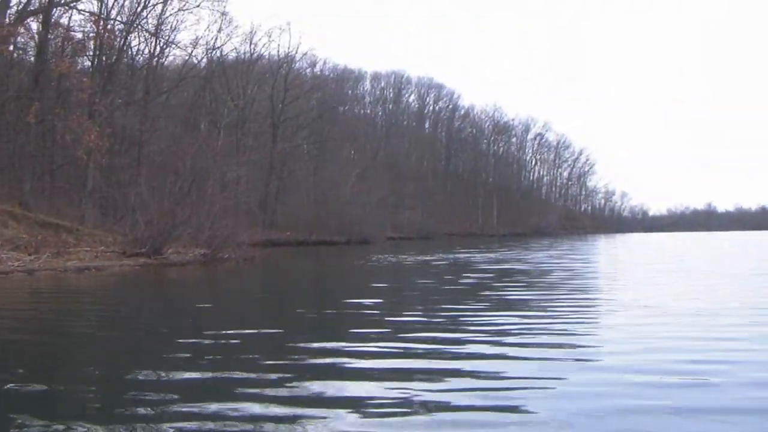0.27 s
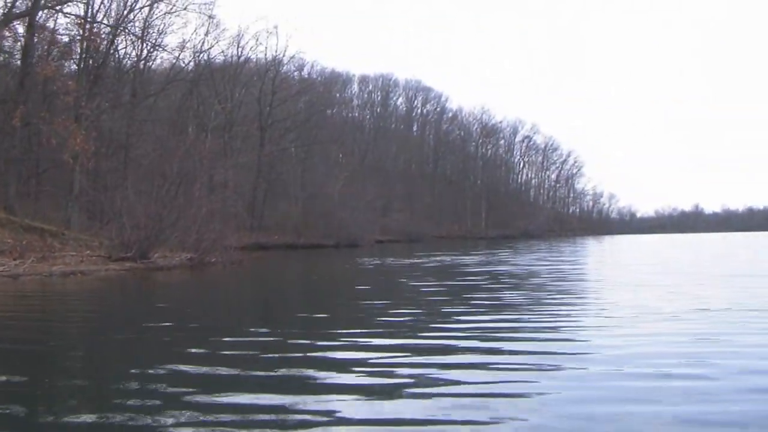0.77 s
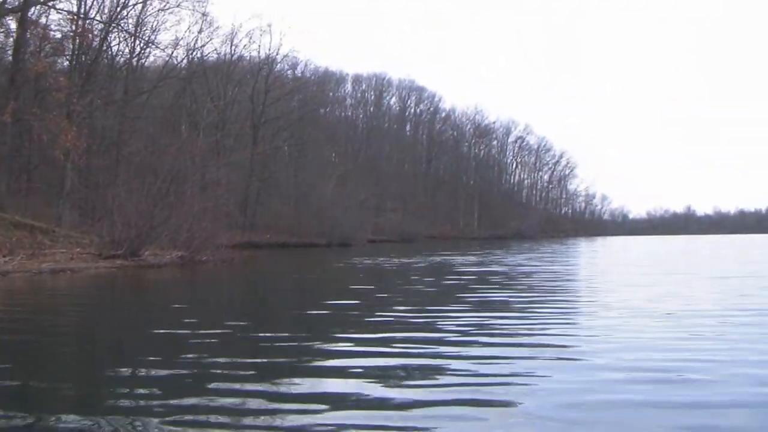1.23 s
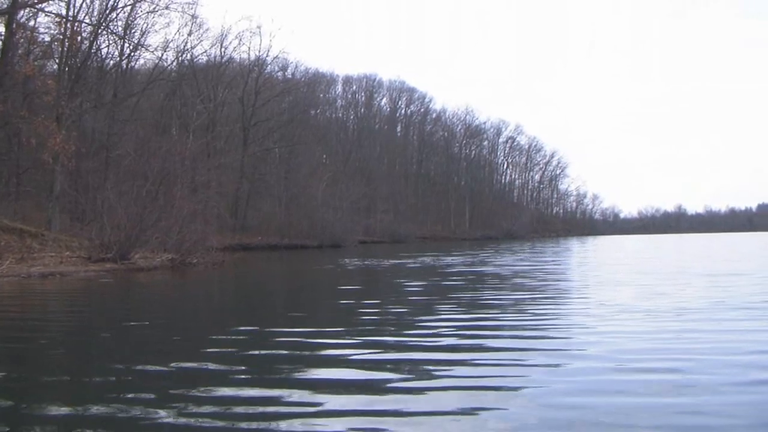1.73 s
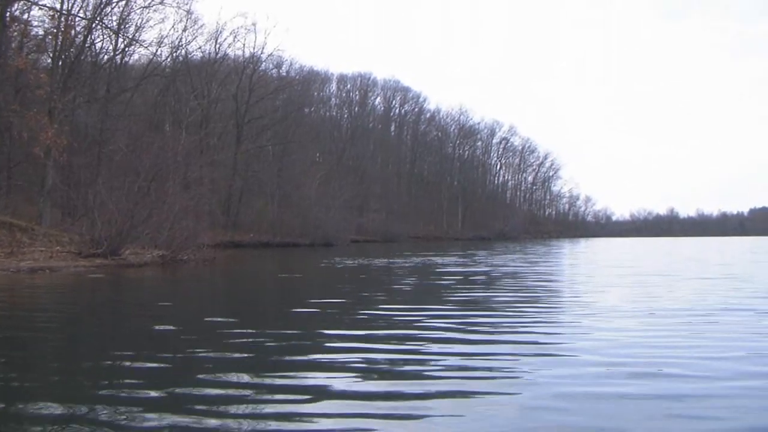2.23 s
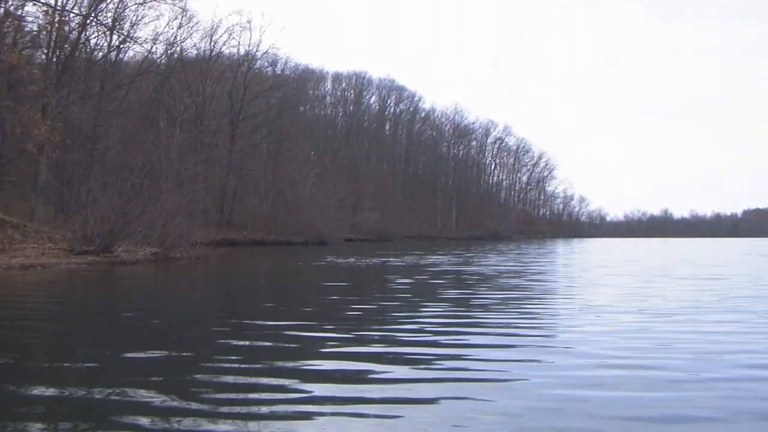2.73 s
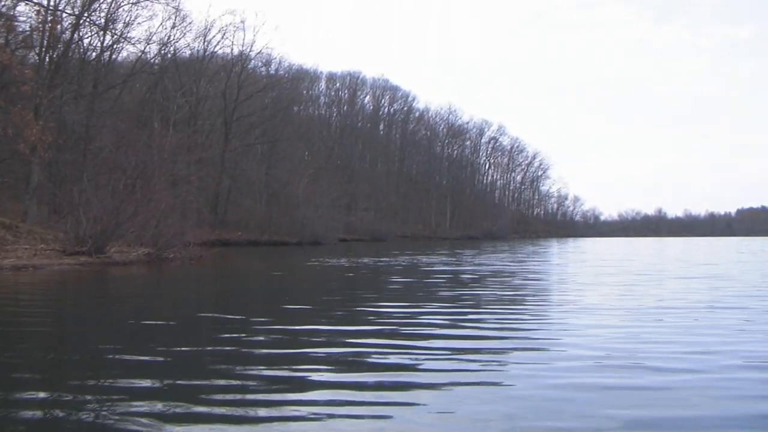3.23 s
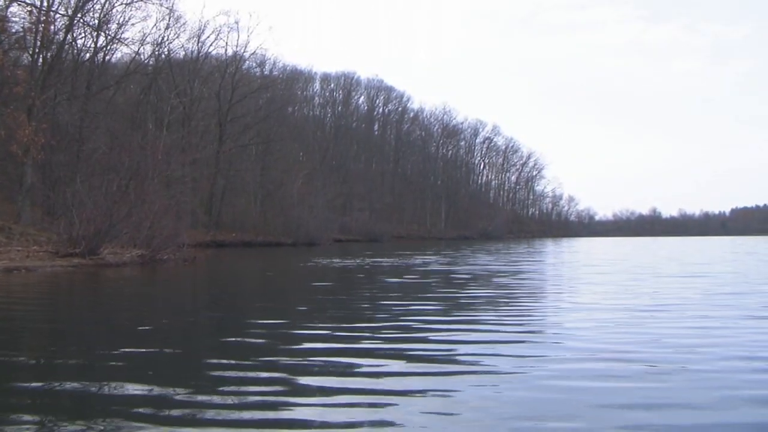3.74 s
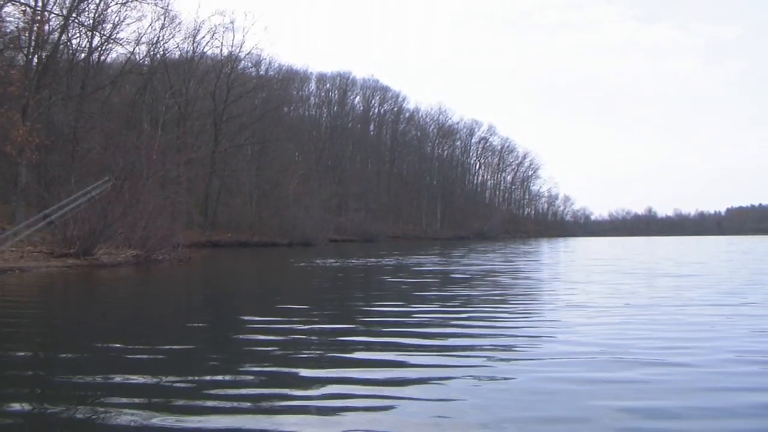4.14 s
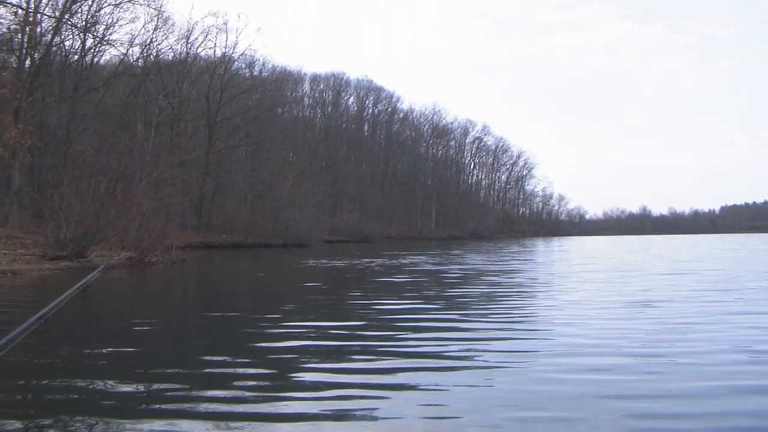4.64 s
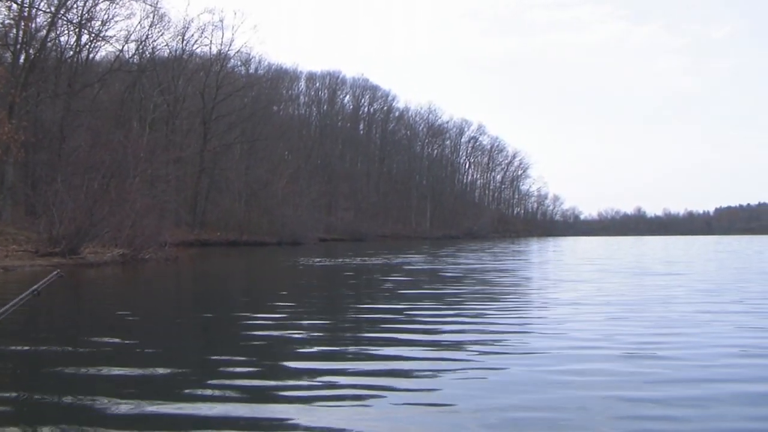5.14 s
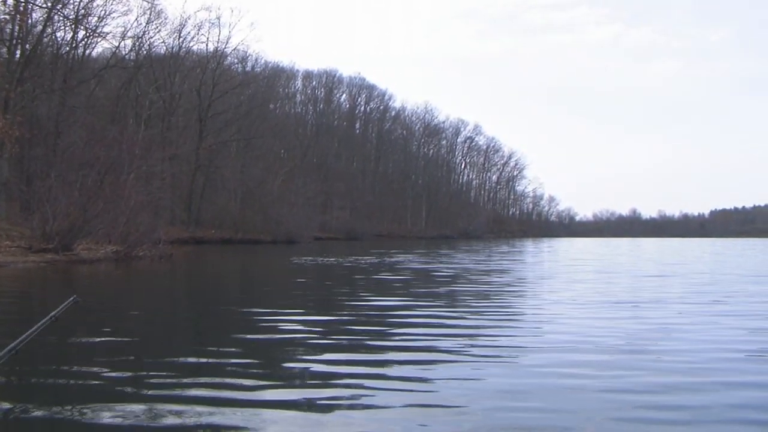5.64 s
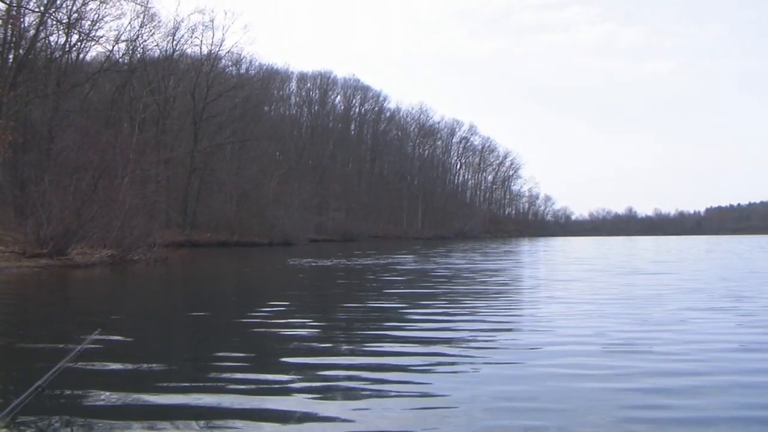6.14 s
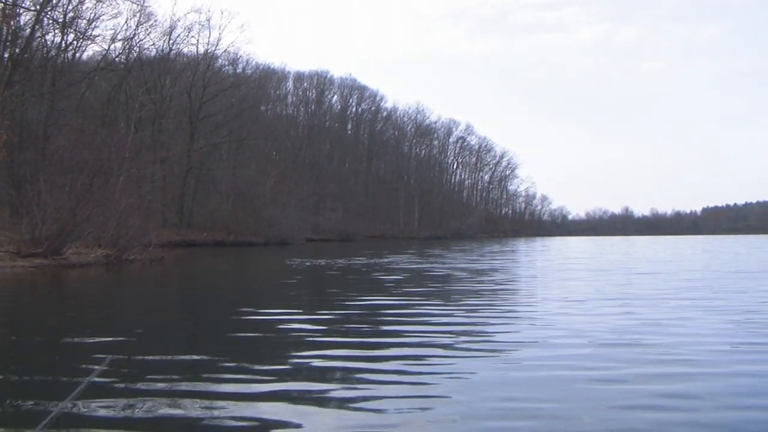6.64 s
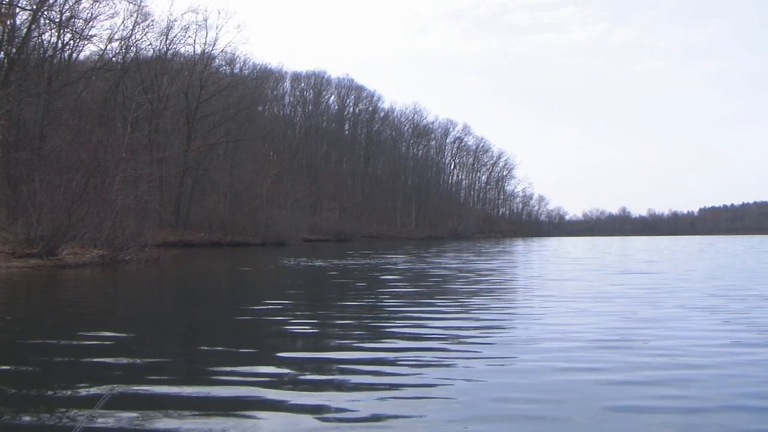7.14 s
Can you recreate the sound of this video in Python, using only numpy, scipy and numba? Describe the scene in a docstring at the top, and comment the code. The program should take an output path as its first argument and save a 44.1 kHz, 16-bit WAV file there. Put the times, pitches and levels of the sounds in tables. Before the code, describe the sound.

A close fishing cast begins with a brief gritty rod swish already dying away. Thin line hisses outward, brushing and ticking against the guides, until a sharp metallic bail snap at about 1.4 seconds. Small handling knocks follow while woodland birds whistle, churr and chip. Four faint taps come late, then distant tyre noise swells. Quiet outdoor lake, stereo microphone near the angler on the left, with soft tree echoes and light hiss.

```python
"""A fishing rod swishes in a cast from a small boat on a wooded lake: a burst of gritty noise that dies away.
Line whistles out as a moving noise band, brushes the guides and ticks against them.
The bail snaps shut and the reel settles: short blows ring many small modes, which the ticks share.
Birds sing sliding near-sine notes from the trees, and four faint taps ring there too.
Far road noise and low hum lie underneath; a car's tyre roar swells at the end."""
import sys
import numpy as np
from scipy import signal
from scipy.fft import rfft, irfft, next_fast_len
from scipy.io import wavfile
from scipy.ndimage import uniform_filter1d
from numba import njit

SR = 44100
rng = np.random.default_rng(int(sys.argv[2]) if len(sys.argv) > 2 else 0)


def master(y):
    """Save y as 16-bit WAV."""
    cut = np.clip(np.atleast_2d(y).T, -1, 1)
    pcm = np.round(cut * 32767)  # scale
    wavfile.write(sys.argv[1], SR, pcm.astype(np.int16))


def voltage_ratio(decibels):
    """Convert decibels (scalar or array-like) to amplitude ratios, 20 dB per decade."""
    exponent = np.asarray(decibels, float) / 20
    return 10 ** exponent


N = 326163  # samples, about 7.4 s
T = np.arange(N) / SR
TOP_HZ = 15800  # upper edge of the noises and of the finished sound


def curve(table, column=1):
    """One column of a table, read over time."""
    rows = np.array(table)
    return np.interp(T, rows[:, 0], rows[:, column])


def over_hz(table, hz):
    """A table over pitch, read on a log-frequency axis."""
    rows = np.array(table)
    return np.interp(np.log(hz), np.log(rows[:, 0]), rows[:, 1])


def unit(x):
    """Scales to rms 1."""
    return x / np.sqrt(np.mean(x ** 2))


def coloured(colour, alike):
    """Spectrum of stereo noise with a given colour, and its Hz axis; alike: likeness of both ears, -1 to 1."""
    hz = np.maximum(np.fft.rfftfreq(N, 1 / SR), 1)
    mid, side = rfft(rng.standard_normal((2, N)))
    like = np.clip(alike(hz), -1, 1)
    ears = np.sqrt(1 + like) * mid + np.sqrt(1 - like) * side * np.array([[1], [-1]])
    return voltage_ratio(over_hz(colour, hz)) * (hz < TOP_HZ) * ears, hz


def walk(rate):
    """Random levels held 1 / rate s and smoothed twice; scaled to rms 1."""
    k = int(SR / rate)
    held = np.repeat(rng.standard_normal(N // k + 1), k)
    return unit(uniform_filter1d(uniform_filter1d(held, k), k)[:N])


def place(x, pan_db, turn):
    """Sets a sound between left and right by a level step [dB] and a phase turn [rad]."""
    z = signal.hilbert(x, next_fast_len(N))[:N]
    right = np.real(z * np.exp(-1j * turn))
    return np.array([voltage_ratio(pan_db / 2) * x, voltage_ratio(-pan_db / 2) * right])


def echo(x, t60, wet_db, from_s):
    """Scattered returns as a dying noise tail, different at each ear."""
    t = np.arange(int(t60 * SR)) / SR
    tail = rng.standard_normal((2, len(t))) * np.exp(-np.log(1000) * t / t60) * (t > from_s)
    tail = tail / np.sqrt((tail ** 2).sum(axis=1, keepdims=True))
    return voltage_ratio(wet_db) * signal.fftconvolve(x[None], tail, axes=1)[:, :N]


def ring(modes, chance):
    """Dying sines, one per mode; chance shifts each one's strength and, slightly, its pitch."""
    t = np.arange(int(.08 * SR)) / SR
    hz, db, t60 = np.transpose(modes)[:, :, None]
    strength = voltage_ratio(db + 2.5 * chance[0])
    decay = np.exp(-np.log(1000) * t / t60)
    return strength * decay * np.sin(2 * np.pi * hz * (1 + .012 * chance[1]) * t)


@njit
def svf(x, hz, widths):
    """State-variable band-pass whose centre and width can move; width is a share of the centre."""
    y, b, l = np.empty(len(x)), 0., 0.
    for i in range(len(x)):
        g, width = np.tan(np.pi * hz[i] / SR), widths[i]
        v = (b + g * (x[i] - l)) / (1 + g * (g + width))
        b, l, y[i] = 2 * v - b, l + 2 * g * v, width * v
    return y


# rod through the air: (time [s], level [dB], left minus right [dB])
ROD_SWISH = [(0.0, -30.5, 10), (0.006, -30, 6.5), (0.092, -48, 7.5), (0.2, -57.5, 10)]
# colour of that air noise: (pitch [Hz], relative level [dB per Hz])
ROD_COLOUR = [(90, -53), (200, -22.5), (750, -3.5), (1500, -2.5), (3000, -2.5), (5100, -4), (8000, -9),
              (15500, -18)]


def swish():
    """Eddies shed by the rod tip: gritty broad noise that dies as the rod stops."""
    smooth = unit(irfft(coloured(ROD_COLOUR, lambda hz: .05 + 0 * hz)[0], N))
    air = smooth * voltage_ratio(2.6 * walk(2500))  # fast random level changes make the grit
    pan_db = curve(ROD_SWISH, 2) * np.array([[.5], [-.5]])
    fade = np.clip((ROD_SWISH[-1][0] + 0.054 - T) / 0.07, 0, 1)
    return air * voltage_ratio(curve(ROD_SWISH) + pan_db) * fade


# line flying out, before the tugs: (time [s], level [dB], centre [Hz], width [share of centre])
LINE_WHISTLE = [(0, -53, 10000, 1.4), (.05, -46.5, 11800, 1.3), (.2, -49, 12300, 1.8),
                (.35, -48.5, 13200, 0.84), (.5, -51.5, 9400, 0.78), (.74, -59, 8200, 0.9),
                (.84, -65, 7500, 0.73), (.92, -71, 7000, .4)]
# jerks that speed the line up for a moment: (time [s], gain [dB])
LINE_TUGS = [(.42, 1.5), (.565, 4), (.67, 5.5)]
TUG_S, TUG_HZ_PER_DB, TUG_WIDTH_PER_DB = 0.027, 420, .06


def line():
    """Thin line whistles as a noise band whose centre follows its speed, with a random flutter in level."""
    tug_db = sum(db * np.exp(-((T - s) / TUG_S) ** 2) for s, db in LINE_TUGS)
    hz = np.clip(curve(LINE_WHISTLE, column=2) + TUG_HZ_PER_DB * tug_db, 3000, 16000)
    width = np.clip(curve(LINE_WHISTLE, column=3) + TUG_WIDTH_PER_DB * tug_db, .1, 2)

    def one_ear():
        return svf(svf(rng.standard_normal(N), hz, width), hz, width) / np.sqrt(width)

    band = np.array([one_ear() for _ in range(2)])
    band = irfft(rfft(band) * (np.fft.rfftfreq(N, 1 / SR) < TOP_HZ), N)
    level_db = curve(LINE_WHISTLE) + tug_db + 1.5 * walk(61.0)
    return unit(band) * voltage_ratio(level_db + np.array([[3.], [-3.]])) * (T < LINE_WHISTLE[-1][0])


# colour of far road and hiss: (pitch [Hz], relative level [dB per Hz])
ROAD_COLOUR = [(15, -72.5), (25, -34.5), (43, -25), (86, -13.5), (129, -12), (215, -6), (246, -7),
               (582, -3.5), (722, 0), (1710, -2.5), (3260, -11), (4500, -14), (6210, -16), (15500, -20)]
# how alike both ears are: (pitch [Hz], likeness [0-1])
ROAD_LIKENESS = [(60, 0.24), (130, 0.45), (290, 0.61), (640, 0.23), (1410, 0.56), (3100, 0.084),
                 (6820, 0.09), (15000, 0.05)]
# side it leans to: (pitch [Hz], left minus right [dB])
ROAD_SIDE = [(60, -4), (110, -2.5), (200, -2.5), (380, -1), (700, -1.0), (1290, 0), (2380, -0.5),
             (4400, 1.5), (8120, 0.5), (15000, 0.0)]
ROAD_DB = -58.5  # rms of both ears' average, before the wander


def road():
    """Smooth far traffic over microphone hiss; bands below 3500 Hz wander a little on their own."""
    tone, hz = coloured(ROAD_COLOUR, lambda hz: over_hz(ROAD_LIKENESS, hz))
    tone = tone * voltage_ratio(over_hz(ROAD_SIDE, hz) * np.array([[.5], [-.5]]))
    whole, out = irfft(tone, N), 0
    edges = [0, 150, 400, 900, 1800, 3500, SR]  # Hz
    for lo, hi in zip(edges, edges[1:]):
        wander_db = (1.07 * walk(1.89) + 0.37 * walk(12)) * (hi < SR)
        out = out + voltage_ratio(wander_db) * irfft(tone * ((hz >= lo) & (hz < hi)), N)
    return out * voltage_ratio(ROAD_DB) / np.sqrt(np.mean(whole.mean(axis=0) ** 2))


# low tones: (pitch [Hz], level they waver around [dB])
LOW_TONES = [(59, -93), (94, -88.5), (262, -85)]


def hum():
    """Faint low sines, wavering in level and phase."""
    out = 0
    for hz, db in LOW_TONES:
        level = np.sqrt(2) * voltage_ratio(db + 2.6 * walk(2.97))
        out = out + level * np.sin(2 * np.pi * hz * T + 0.57 * walk(4.01))
    return out * voltage_ratio(np.array([[-1.5], [1.5]]))


# line brushing the guides: (time [s], level [dB])
GUIDE_BRUSH = [(0.08, -51), (0.154, -56), (0.382, -56.5), (0.428, -55), (0.46, -60.5), (0.536, -55),
               (0.58, -68)]
# ringing of the guide frames: (pitch [Hz], relative level [dB], time to fall 60 dB [s])
GUIDE_MODES = [(4080, -2.5, 0.0094), (4783, 1, 0.0053), (5760, 5, 0.0025), (6800, -8, .003),
               (3000, -18, 0.0021)]


def guides():
    """Dense uneven touches of the line ring the guide frames."""
    struck = rng.random((2, N)) < 1500 / SR  # about 1500 touches a second at each ear
    touches = struck * voltage_ratio(2.12 * rng.exponential(size=(2, N))) * rng.choice([-1, 1], (2, N))
    frame = ring(GUIDE_MODES, np.zeros(2)).sum(axis=0)
    rung = signal.fftconvolve(touches, frame[None], axes=1)[:, :N]
    within = (T > GUIDE_BRUSH[0][0]) & (T < GUIDE_BRUSH[-1][0])
    return unit(rung) * voltage_ratio(curve(GUIDE_BRUSH) + np.array([[2.5], [-2.5]])) * within


# the line ticks against the rod guides: (time [s], frame peak [dB])
LINE_TICKS = [(.175, -46), (.212, -41), (.301, -42), (.335, -41), (.364, -43), (.406, -38), (.419, -43),
              (0.432, -42), (.51, -43.5), (.541, -42), (.634, -44)]


def ticks():
    """Line ticks as (time [s], frame peak [dB], body and bright metal over it [dB], rattle [s])."""
    return [(s, db, -10, -4, .0014) for s, db in LINE_TICKS]


# the bail springs shut: (time [s], frame peak [dB], body over it [dB], bright metal over it [dB],
# loss per bounce [dB])
BAIL_SNAP = [(1.3485, -34, 2.5, 0, 4.5), (1.3626, -16.5, -32, 7.5, 30), (1.364, -18, -17, -1, 20),
             (1.368, -25, -12, 0, 20), (1.3711, -17.5, -4, -2, 28), (1.374, -15.5, -3.5, 3, 5),
             (1.4045, -24.5, -5, 4, 4)]
BOUNCE_S, BOUNCE_BODY_DB, BOUNCE_BRIGHT_DB = .0043, 3, -3.5  # each bounce is duller


def snap():
    """Bail blows, each with three bounces, in the columns of ticks()."""
    return [(s + k * BOUNCE_S, db - k * loss_db, body_db + k * BOUNCE_BODY_DB,
             bright_db + k * BOUNCE_BRIGHT_DB, 0.0013)
            for s, db, body_db, bright_db, loss_db in BAIL_SNAP for k in range(4)]


# hands knocking rod and reel: (time [s], frame peak [dB], body over it [dB], bright metal over it [dB])
HAND_KNOCKS = [(.603, -41.5, 2.5, -12), (.612, -45, -1, -12), (1.449, -45, -12, -14),
               (1.4535, -41, -9, -14), (1.4745, -38, -12, -12), (1.504, -39, -10, -22),
               (1.5068, -38.5, 1.5, -26), (1.5163, -53, 7, -17), (1.521, -32, 5.5, -21),
               (1.5235, -38, 9, -14), (1.529, -42.5, -4, 0), (1.535, -41, -3, -22), (1.725, -50, -6, -19.5),
               (1.755, -54, 9, -16.5), (1.829, -44.5, -9.5, -18), (1.841, -43, 1.5, -18),
               (2.2207, -45, -11, -2.5), (3.026, -51.5, 3, -7.5), (3.899, -49, -9.5, -3),
               (4.257, -49, -1.5, -18.5), (4.905, -47.5, -7, -8)]


def knocks():
    """Hand knocks, in the columns of ticks()."""
    return [(*row, 0.00085) for row in HAND_KNOCKS]


# ringing of the reel: (pitch [Hz], relative level [dB], time to fall 60 dB [s])
REEL_MODES = [(490, -18, 0.0074), (794, 6, 0.03), (1250, -29, 0.0052), (1540, -13, 0.0097),
              (1950, 2, 0.0083), (2113, 0, 0.025), (2410, 1.5, 0.0236), (2800, -9, 0.0089),
              (3595, -11, 0.013), (4140, -1, 0.0087), (4720, 1.5, 0.015), (5210, 4, 0.014),
              (5800, -3, 0.017), (6300, -4, 0.021), (7000, -6, .012), (7500, -1, 0.012),
              (8330, 5.5, 0.0092), (9300, 4, 0.0079), (10070, 3.5, 0.0053), (10840, -9, .008),
              (12600, -7, 0.0065), (13300, -4.5, 0.0058), (14800, -17, 0.0042)]
# handle, body, frame, bright metal: (lowest [Hz], highest [Hz], left minus right [dB], phase turn [rad])
REEL_PARTS = [(398, 1185, 2.5, 1.5), (1018, 3500, 5, 1.67), (3100, 6845, 4, 1.68), (7150, 16800, 3.5, 1.1)]


def reel():
    """Each tick or blow is one contact and a short rattle into handle, body, frame and bright metal modes."""
    out, hz = np.zeros((4, N + SR)), np.array(REEL_MODES)[:, 0]
    t = np.arange(int(.025 * SR)) / SR
    crack_t = np.arange(int(.08 * SR)) / SR
    for s, db, body_db, bright_db, rattle in ticks() + snap() + knocks():
        rings = ring(REEL_MODES, rng.standard_normal((2, len(REEL_MODES), 1)))
        contacts = rng.standard_normal((4, len(t))) * np.exp(-t / max(rattle, 1e-4))
        contacts[:, 0] = 3.9
        # countless small modes blur into a short crack between the clear ones
        crack = 1.1 * rng.standard_normal(len(crack_t)) * np.exp(-crack_t / 0.0018)
        # the duller the blow, the more it moves the handle
        handle_db = body_db - 21.0 - .5 * bright_db
        for k, part_db in enumerate((handle_db, body_db, 0, bright_db)):
            lo_hz, hi_hz = REEL_PARTS[k][:2]
            modes = rings[(hz >= lo_hz) & (hz < hi_hz)].sum(axis=0)
            hit = signal.fftconvolve(modes + crack * (k > 0), contacts[k])
            # each part radiates only around its own modes
            around = signal.butter(2, [0.91 * lo_hz, 1.306 * hi_hz], "band", fs=SR, output="sos")
            hit = signal.sosfilt(around, hit)
            i = int(s * SR)
            out[k, i:i + len(hit)] += voltage_ratio(db + part_db) * hit / np.abs(hit).max()
    direct = sum(place(x[:N], pan_db, turn) for x, (_, _, pan_db, turn) in zip(out, REEL_PARTS))
    return direct + echo(out.sum(axis=0)[:N], 0.11, -19, 0.0034)


def bird(notes, edge_s, rough=0.092, beat_hz=0, slide_hz=0, blur_hz=0):
    """Near-sine notes on smoothed pitch paths: rough wavers the level, blur_hz the pitch;
    a trill is chopped at beat_hz and slides up by slide_hz within each beat."""
    out = np.zeros(N)
    waver, blur = 1 + rough * walk(150), blur_hz * walk(600)
    for note in notes:
        s, hz, db = np.transpose(note)
        part = slice(int(s[0] * SR), int(s[-1] * SR))
        t = T[part]
        cycle = (beat_hz * (t - s[0]) + .5) % 1 - .5
        path = uniform_filter1d(np.interp(t, s, hz), int(edge_s * SR) + 1, mode="nearest")
        pitch = path + slide_hz * cycle + blur[part]
        edges = np.clip(np.minimum(t - s[0], s[-1] - t) / edge_s, 0, 1)
        level = np.sqrt(2) * voltage_ratio(np.interp(t, s, db)) * edges * np.cos(np.pi * cycle) ** 2
        out[part] += level * np.sin(2 * np.pi * np.cumsum(pitch) / SR)
    return out * waver


def slur(rows, arch=0):
    """Notes with an even pitch slide; arch lowers both ends by a share per square second of length."""
    u = np.linspace(-.5, .5, 9)
    notes = []
    for s, length, hz, slide_hz, db in rows:
        pitch = hz * (1 - arch * (2 * u * length) ** 2) + slide_hz * u
        notes.append(np.array([s + length * (u + .5), pitch, db + 0 * u]).T)
    return notes


# when the two-note song comes: (high note's time [s], low note level [dB], high note level [dB])
SONG_TIMES = [(.615, -64, -62), (.9, -63, -59), (1.678, -62, -56), (1.95, -63, -62)]
# rising low note: (time from the high note [s], pitch [Hz], level change [dB])
SONG_LOW = [(-.132, 2125, -3.5), (-.06, 2290, -1), (-.027, 2310, -1)]
# high note that drops in: (time from its start [s], pitch [Hz], level change [dB])
SONG_HIGH = [(0, 3150, 0.5), (.018, 2806, 0), (.068, 2900, -3)]


def whistler():
    """A two-note whistle, a rising low note and a high one that drops in."""
    notes = [np.add(note, [s, 0, db])
             for s, *dbs in SONG_TIMES for note, db in zip((SONG_LOW, SONG_HIGH), dbs)]
    return bird(notes, 0.0029)


# far whistles: (time [s], length [s], middle pitch [Hz], slide from start to end [Hz], level [dB])
FAR_NOTES = [(1.99, .09, 2620, -40, -70), (2.135, .075, 2560, 60, -62.5), (2.3, .1, 2630, 0, -68),
             (2.32, 0.11, 2820, 40, -73.5), (2.62, 0.1, 2625, -30, -70), (2.625, .13, 2790, -58, -68),
             (2.5, 0.075, 2240, 100, -76), (3.23, 0.057, 2260, 250, -71), (3.3, .12, 2390, -23, -72),
             (4.15, 0.31, 2860, 0, -76)]


def far_whistler():
    """Soft far whistles, wavering and slightly blurred."""
    return bird(slur(FAR_NOTES), 0.0097, rough=0.32, blur_hz=25.0)


# churr: (time [s], length [s], middle pitch [Hz], slide from start to end [Hz], level before the throat [dB])
CHURR_NOTES = [(2.882, .013, 1800, 500, -53), (2.91, 0.023, 1215, 50, -51.5), (2.948, .016, 1170, 410, -51),
               (2.97, 0.016, 1180, 0, -50), (2.991, 0.023, 1717, -42, -43), (3.035, 0.0218, 1734, -20, -43),
               (3.062, .012, 1920, 202, -53), (3.078, .0108, 1620, -310, -58),
               (3.086, .0147, 1330, -100, -47), (3.095, .0121, 1770, -350, -55.5),
               (3.112, 0.011, 1480, -100, -60), (3.135, .01, 1650, 100, -60),
               (5.408, 0.018, 2110, 582, -53.5), (5.455, 0.011, 2010, 50, -54),
               (5.473, 0.0209, 1618, -10, -46.5), (5.514, 0.024, 1760, -60, -46),
               (5.558, 0.031, 2050, -140, -49.5), (5.6, 0.0089, 1420, 50, -50),
               (5.612, 0.015, 1694, 190, -56), (5.652, .0075, 1140, -50, -49)]


def churr():
    """Short arched slurs; a throat resonance favours their middle and weakens the highest notes."""
    voice = bird(slur(CHURR_NOTES, arch=460), 0.00082, rough=0.07, blur_hz=21.0)
    return svf(voice, np.full(N, 1600.), np.full(N, .3))


# trill: (time [s], length [s], middle pitch [Hz], slide from start to end [Hz], level [dB])
TRILL_NOTES = [(2.903, .08, 4980, -190, -66), (3.84, 0.18, 4980, 210, -72)]


def trill():
    """Notes chopped 66 times a second, each beat sliding up."""
    return bird(slur(TRILL_NOTES), .005, beat_hz=66, slide_hz=600)


# high chips: (time [s], length [s], middle pitch [Hz], slide from start to end [Hz], level [dB])
CHIP_NOTES = [(2.982, .03, 4360, -545, -70), (3.205, .0475, 4456, -420, -63),
              (3.515, 0.049, 4450, -415, -63), (3.525, .022, 5300, 300, -70),
              (3.735, .023, 5220, -200, -69), (3.795, 0.045, 4500, 200, -62),
              (3.835, 0.021, 4210, -550, -63), (3.945, .02, 4985, -105, -66), (4.14, .05, 5280, 500, -74),
              (4.215, 0.039, 4790, -480, -67), (4.25, 0.025, 4600, 90, -65.5),
              (4.455, 0.042, 4350, -1600, -67), (4.505, .048, 4560, 990, -70),
              (4.6, .019, 4240, -450, -70.5), (4.62, .034, 4110, 600, -71), (7.333, .026, 4870, -1650, -64),
              (7.36, 0.027, 5280, -500, -70)]


def chipper():
    """Short high chips with slightly arched, sliding pitch."""
    return bird(slur(CHIP_NOTES, arch=16), 0.0061)


# chatter: (time [s], length [s], middle pitch [Hz], slide from start to end [Hz], level [dB])
CHATTER_NOTES = [(3.385, .0286, 3640, -160, -74), (3.675, .026, 3540, 50, -72),
                 (5.005, 0.036, 3100, -600, -64), (5.06, .174, 2970, -55, -71),
                 (5.365, .0246, 3520, 139, -68.5)]


def chatter():
    """Raspy notes, strongly wavering and blurred in pitch."""
    return bird(slur(CHATTER_NOTES), 0.0044, rough=0.47, blur_hz=203)


# one long whistle in overlapping pieces:
# (time [s], length [s], middle pitch [Hz], slide from start to end [Hz], level [dB])
LONG_WHISTLE_PIECES = [(6.62, 0.44, 3980, -70, -77), (7.02, .1, 3905, -20, -72), (7.12, .2, 3890, -20, -78),
                       (7.32, .078, 3875, -10, -71)]


def thin_whistle():
    """One faint, long high whistle that sinks slightly and swells twice, in overlapping pieces."""
    return bird(slur(LONG_WHISTLE_PIECES), 0.025, rough=0.51, blur_hz=16.0)


def birds():
    """Birds a little left or right, several together near the middle; trees return far ones more strongly."""
    # (song, left minus right [dB], phase turn [rad], echo share [dB])
    flock = [(whistler(), -2., .4, -3.), (far_whistler(), .4, .3, 3.), (churr(), .4, .2, 3.),
             (chipper(), 2.1, .8, -4.), (trill(), 1.5, .8, 3.), (chatter(), .4, .4, 4.),
             (thin_whistle(), .4, .4, .1)]
    direct = sum(place(x, pan_db, turn) for x, pan_db, turn, _ in flock)
    to_trees = sum(voltage_ratio(wet_db) * x for x, _, _, wet_db in flock)
    return direct + echo(to_trees, .6, -9, 0.014)


TAP_FROM_S, TAP_GAP_S = 6.0935, .125
TAP_DB, TAP_HZ, TAP_T60_S = -45, 1450, .008  # the pitch varies a little from tap to tap


def taps():
    """Four faint even taps, perhaps a bird pecking: each is one short dull ring of wood."""
    late = np.maximum(T - TAP_FROM_S - TAP_GAP_S * np.arange(4)[:, None], 0)
    hz = TAP_HZ * (1 + .08 * rng.standard_normal((4, 1)))
    rings = np.exp(-np.log(1000) * late / TAP_T60_S) * np.sin(2 * np.pi * hz * late)
    return place(voltage_ratio(TAP_DB) * rings.sum(axis=0), .3, .2)


# car drawing nearer: (time [s], level [dB])
CAR_SWELL = [(6.2, -70), (6.45, -65), (6.7, -62), (6.92, -58), (7.2, -59.5), (7.4, -59)]
# colour of its tyre roar: (pitch [Hz], relative level [dB per Hz])
TYRE_COLOUR = [(150, -32), (300, -3.5), (500, -0.5), (800, 4.5), (1200, -1.5), (1800, -3), (3000, -47)]


def car():
    """Tyre roar of one car drawing nearer on the right: coloured noise that swells."""
    roar = unit(irfft(coloured(TYRE_COLOUR, lambda hz: 0.57 + 0 * hz)[0], N))
    level_db = curve(CAR_SWELL) + 0.94 * walk(9)
    fade_in = np.clip((T - CAR_SWELL[0][0]) / 0.18, 0, 1)
    return roar * voltage_ratio(level_db + np.array([[-2.6], [2.6]])) * fade_in


def scene():
    """Angler close on the left, lake around."""
    return swish() + line() + guides() + reel() + birds() + road() + hum() + car() + taps()


def low_pass(x):
    """Removes everything above the highest recorded frequency."""
    return signal.sosfilt(signal.butter(12, 16810, fs=SR, output="sos"), x)


def record(dry):
    """Cuts the top of the mix in two steps, a steep one and a gentler one."""
    steep = signal.ellip(8, .2, 60, 16700, fs=SR, output="sos")
    gentle = signal.ellip(3, .5, 16, TOP_HZ, fs=SR, output="sos")
    cut = signal.sosfilt(gentle, signal.sosfilt(steep, dry))
    return low_pass(cut)


dry = scene()
out = record(dry)
master(out)
```